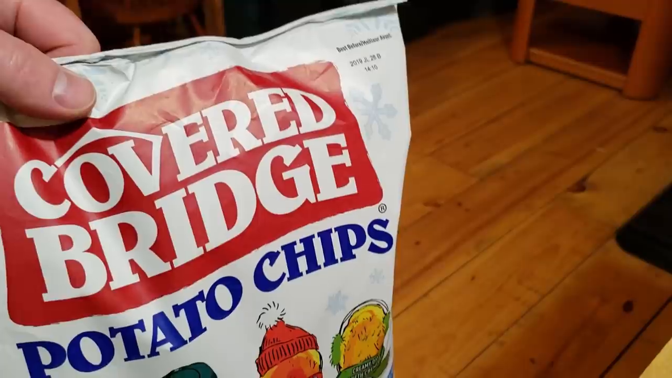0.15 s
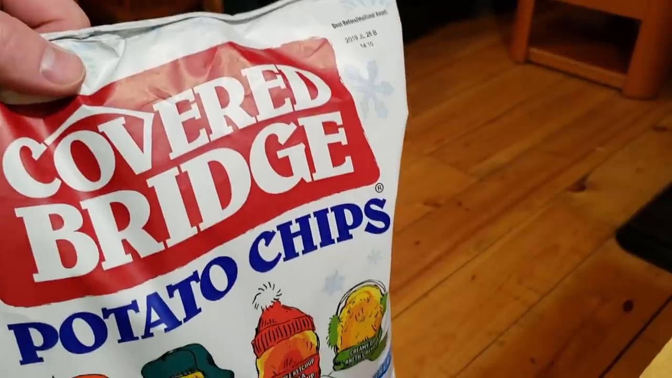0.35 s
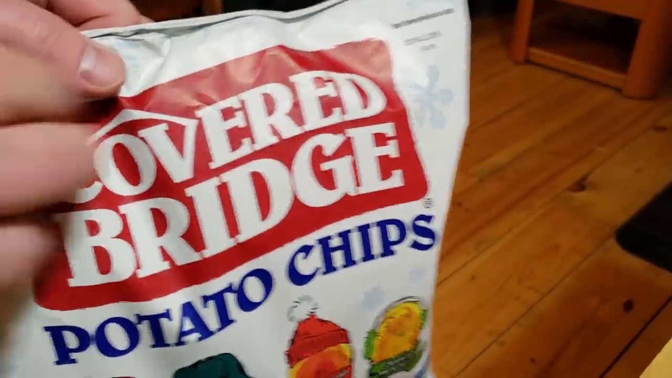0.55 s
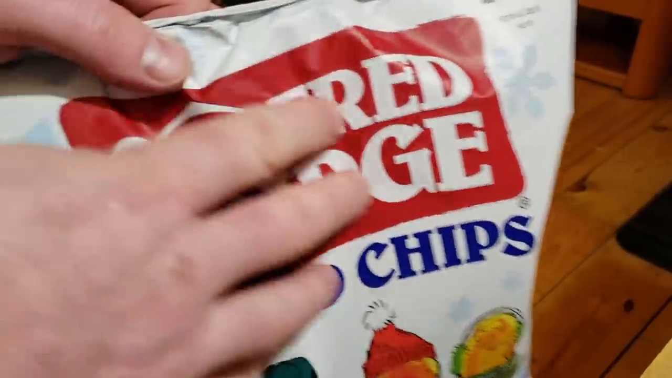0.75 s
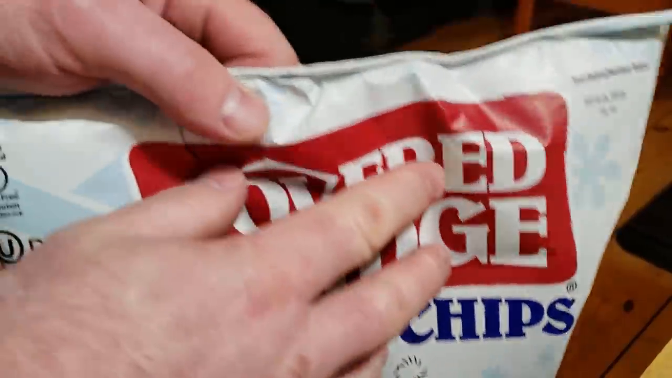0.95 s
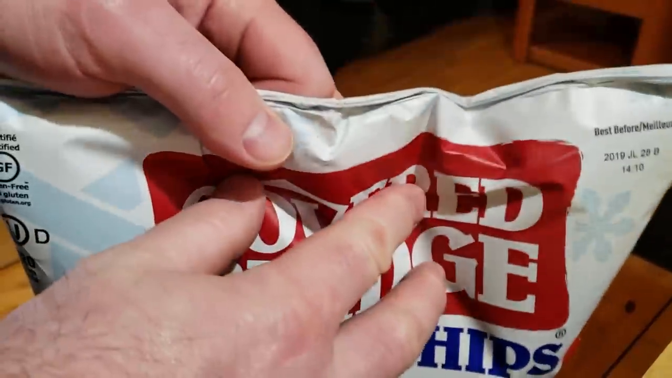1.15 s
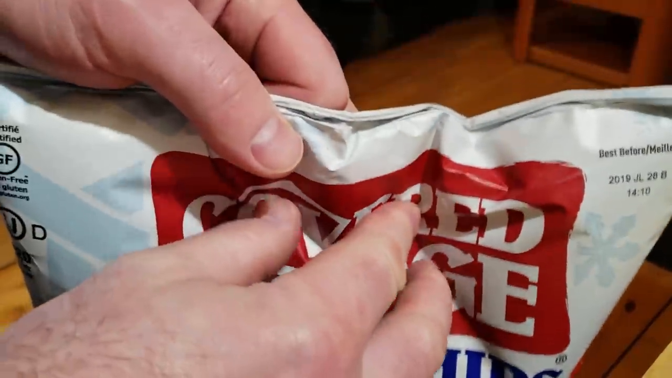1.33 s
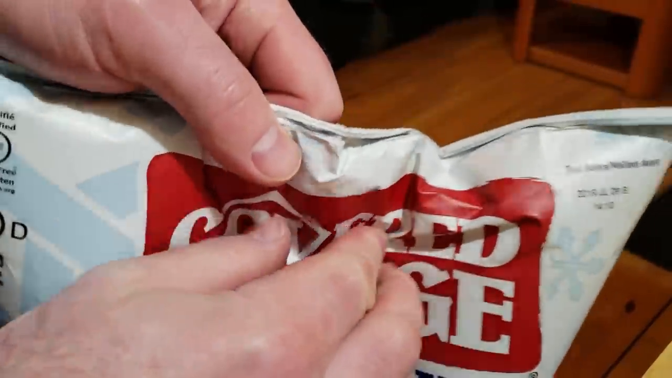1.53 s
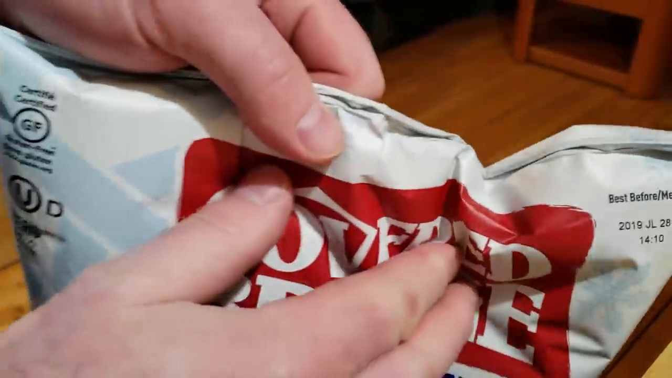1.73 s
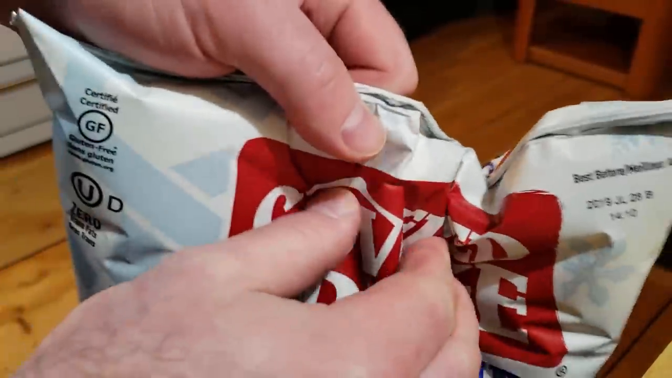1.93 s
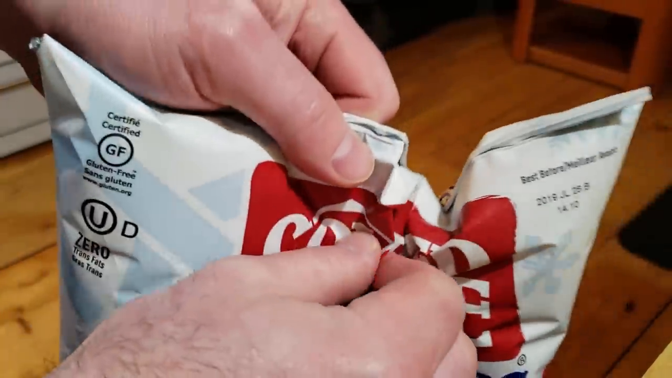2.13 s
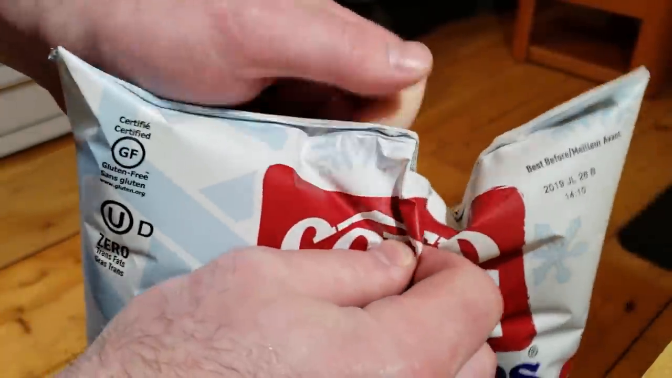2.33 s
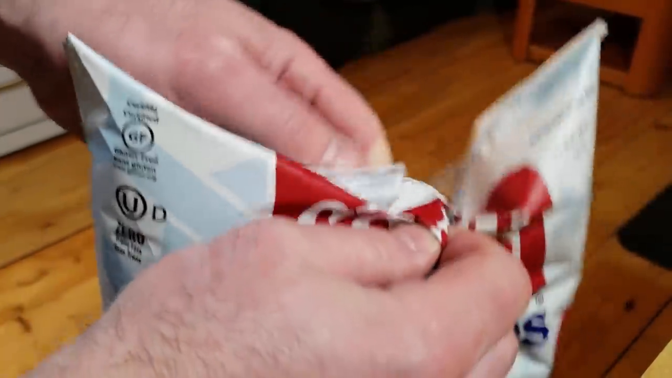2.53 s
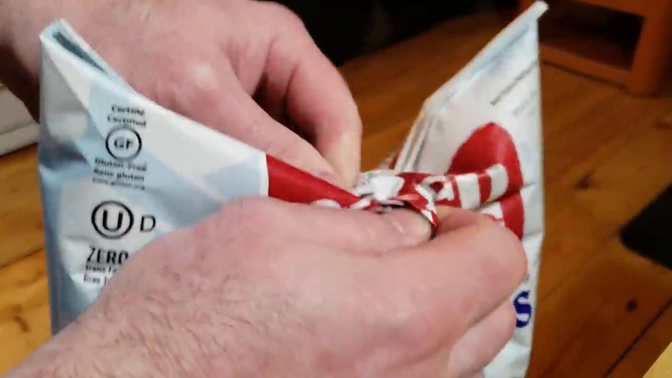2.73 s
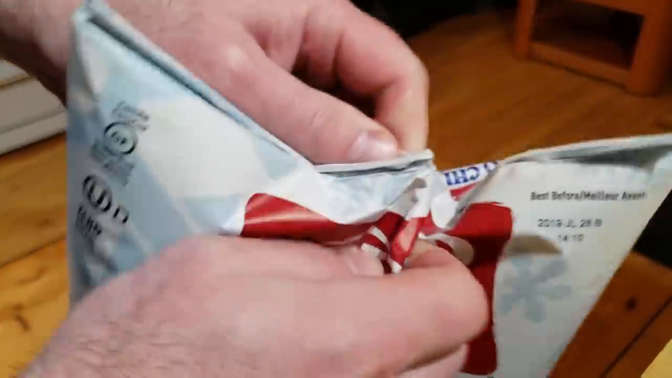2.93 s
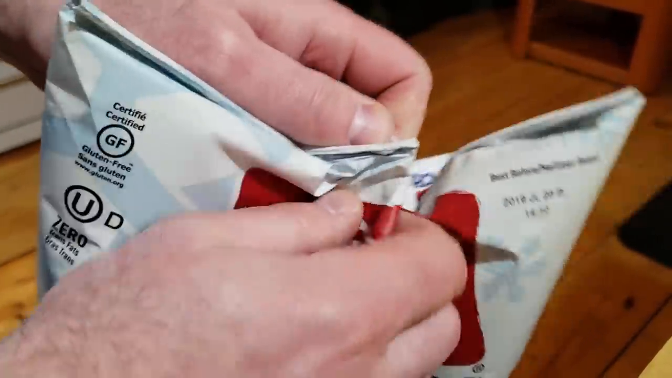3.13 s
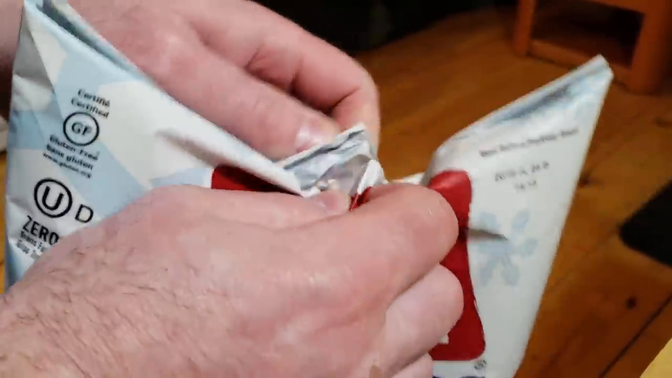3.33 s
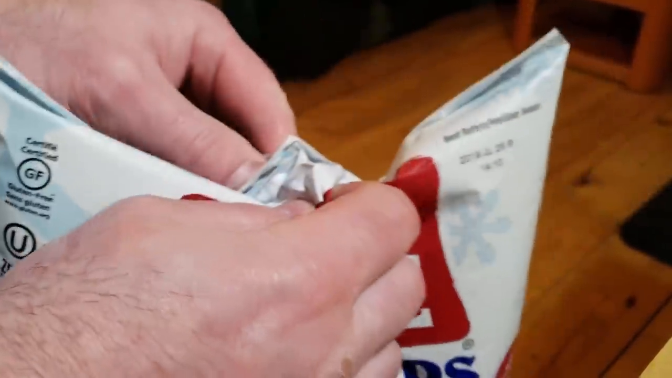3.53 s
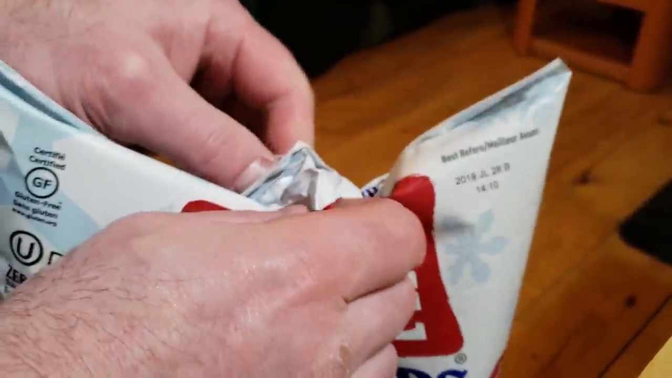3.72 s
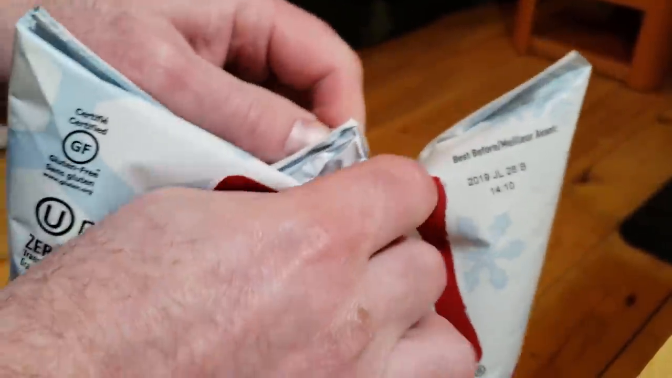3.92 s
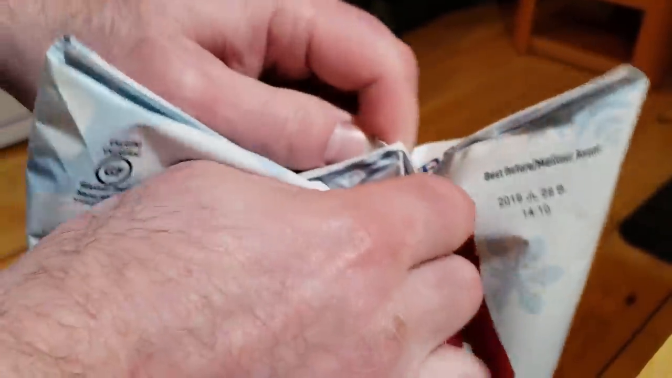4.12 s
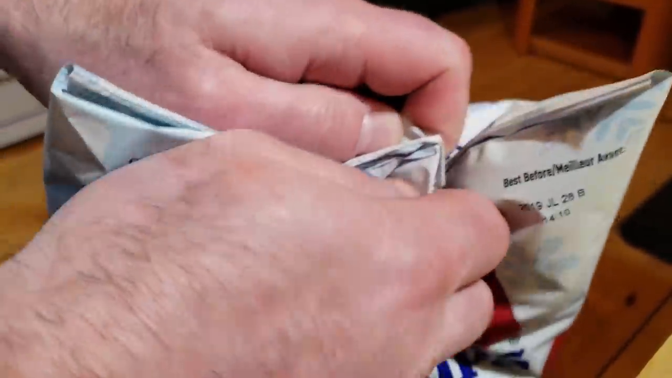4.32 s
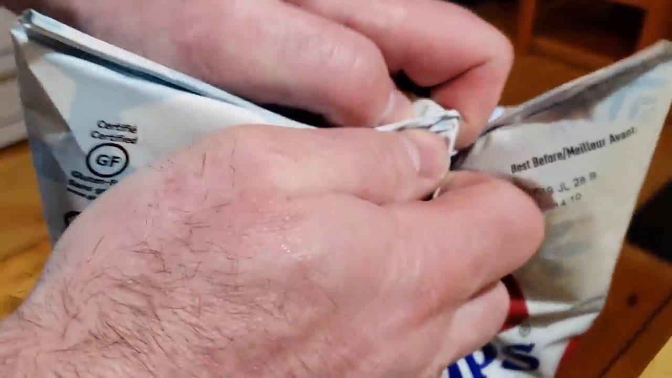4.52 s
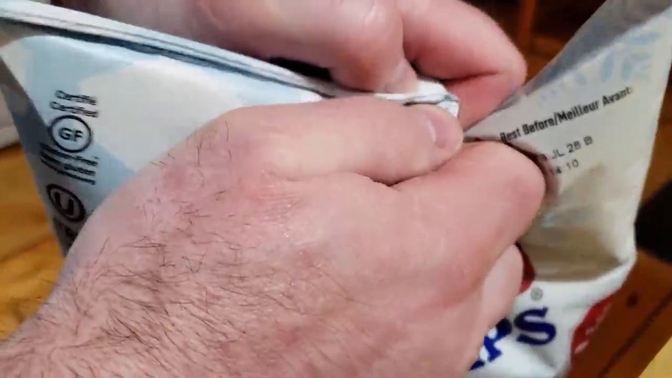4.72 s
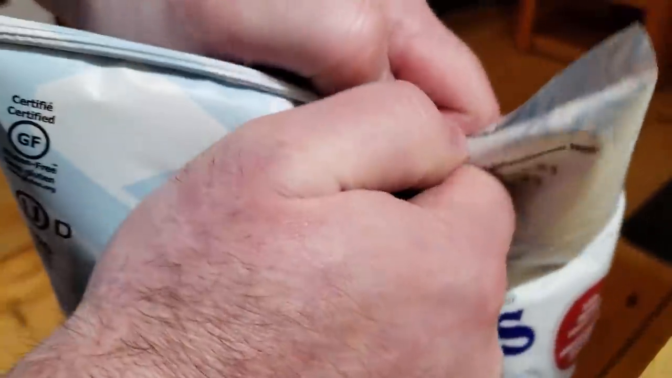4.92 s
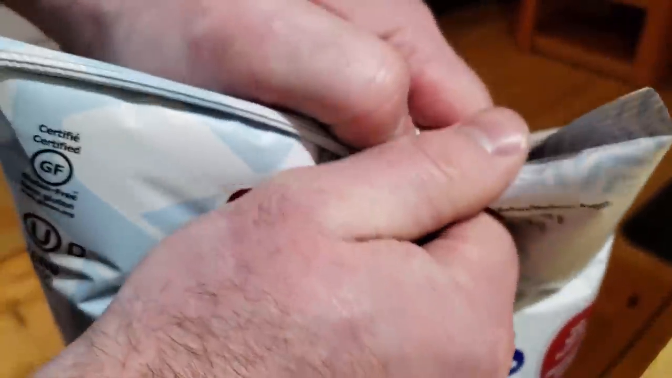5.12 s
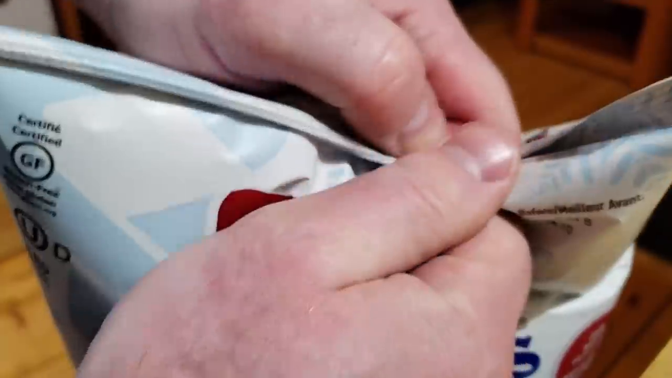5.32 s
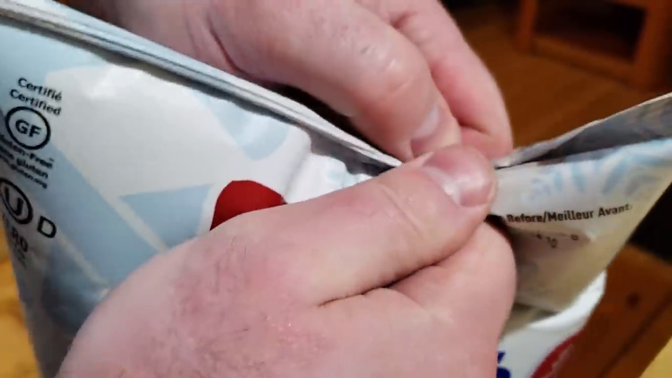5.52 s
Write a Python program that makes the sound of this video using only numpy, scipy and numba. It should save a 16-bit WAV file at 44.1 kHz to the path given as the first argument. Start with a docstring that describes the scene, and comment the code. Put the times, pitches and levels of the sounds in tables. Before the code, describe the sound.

A stiff foil chip bag is squeezed and twisted by hand, snapping and crinkling brightly and unevenly in a small room.

```python
"""A small room, where two hands crumple a foil snack bag just in front of a phone with two microphone ports.
A throbbing drone of beating harmonics sits in resonant rumble; an opening hiss soon drops almost to nothing.
Creases snap as bursts of dying ticks through a resonance, over a rustling swarm of smaller ones;
each snap sets off a flare of hiss and boom. The air in the bag rings as a bank of resonances,
puffs thump as decaying low sines, and the film pops as pairs of short sine rings."""
import sys
import numpy as np
from scipy import signal
from scipy.io import wavfile
from scipy.ndimage import uniform_filter1d
from numba import njit

SR = 44100
rng = np.random.default_rng(int(sys.argv[2]) if len(sys.argv) > 2 else 0)


def master_out(mix):
    """Clip the mix to full scale and print it as 16-bit PCM to the path in sys.argv[1]."""
    frames = np.transpose(np.atleast_2d(mix))
    ceiling = np.clip(frames, -1, 1)
    pcm = np.round(ceiling * 32767).astype(np.int16)
    wavfile.write(sys.argv[1], SR, pcm)


N = 249606

# Drone and rumble, before the phone's filters: t/s, level/dB (RMS of the drone)
HUM_LEVEL = [(0, -54.5), (.2, -56.5), (.3, -60.5), (.65, -55), (1.2, -67), (5.66, -70)]
# Rumble resonances, run twice in series; values for one pass: f/Hz, width/Hz, level/dB
RUMBLE_MODES = [(122, 61, 7), (248, 21, 7.5), (397, 125, -6)]
# Drone harmonics, relative levels: multiple of DRONE_HZ, level/dB
DRONE_HARMONICS = [(4, -5), (5, 0), (7, -3), (8, -3), (9, 0)]
# Smooth hiss, soon almost gone: t/s, level/dB (RMS)
AIR_LEVEL = [(0, -54), (.2, -57), (.25, -77)]
# Tone of the foil, also used to tint the hiss: f/Hz, level/dB
FOIL_TONE = [(300, -5.5), (800, -4), (1500, 3), (3800, 3.5), (6700, 4.5), (7800, 4), (9000, -2.5),
             (11000, 3), (12000, 2.5), (13500, 4.5), (15500, 3)]
# Resonances of the air in the bag; BAG_SLACK adds to the first two: f/Hz, width/Hz, level/dB
BAG_MODES = [(135, 200, 3), (263, 160, 1), (525, 62, -4.5), (642, 64, -4.5), (886, 346, -3)]
# How the bag's slackness shifts its two deepest rings: t/s, lowest level/dB, second level/dB
BAG_SLACK = [(0, 4, -26.5), (1.5, -8, -5.5), (4.2, -0.5, 5), (4.6, -14.5, -5.5), (5.66, -14, -8.5)]
# Handling, before foil tone: t/s, fine crackle level/dB, bag boom level/dB
HANDLING = [(0.3, -79, -80), (0.385, -63.5, -56), (0.42, -49, -46.5), (0.54, -55, -49), (0.675, -79, -70),
            (0.696, -46, -41), (0.99, -35, -34), (1.157, -35.5, -34.5), (1.268, -51.5, -56),
            (1.6, -42.5, -41.5), (2.03, -50, -50), (2.5, -38, -43), (2.87, -49.5, -57),
            (3.16, -48.5, -56.5), (3.282, -68.5, -62), (3.351, -45, -54), (3.62, -64, -68.5),
            (3.752, -44.5, -56.5), (4.008, -43.5, -55.5), (4.358, -39.5, -40), (4.61, -41, -48),
            (4.83, -34, -38), (5.21, -47, -49.5), (5.5, -47.5, -41.5), (5.66, -38, -50)]
# Large creases, before panning and foil tone: t/s, peak level/dB, ring f/Hz, boom level/dB re the peak
SNAPS = [(0.4045, -20, 4740, -12), (0.4895, -12.5, 3130, -18), (0.686, -15, 5470, -16),
         (0.736, -25, 4500, -1), (0.7444, -10, 3020, -17.5), (0.7825, -5, 4140, -11.5),
         (0.824, -6, 4160, -9), (0.8548, -1.5, 3770, -16.5), (0.932, 1.5, 11200, -12.5),
         (0.947, -11, 4500, -22), (0.9742, -7.5, 7600, -23), (0.985, 5.5, 4200, -13),
         (0.9952, -1, 6600, -31), (1.0286, -7.5, 6600, -17), (1.0543, -14, 3400, -37),
         (1.0706, -12.5, 4500, -15), (1.0912, -7, 2930, -36), (1.1025, -36, 4500, -30),
         (1.1501, -1.5, 4860, -14.5), (1.1612, -3, 3600, -20), (1.211, -15, 3430, -29),
         (1.4054, -13.5, 4800, -11.5), (1.4633, -5.5, 6600, -16), (1.5017, -5, 6400, -10),
         (1.5645, -17.5, 7000, -16), (1.5843, -2.5, 6650, -24), (1.591, -17, 4050, -21),
         (1.612, -13, 5000, -11), (1.622, -20, 6000, -35), (1.6409, -6.5, 5100, -34),
         (1.6785, -11.5, 6000, -30), (1.7098, -6, 4700, -18), (1.7462, -11, 5930, -18),
         (1.7816, -16, 1400, -26), (1.816, -6, 6200, -35), (1.831, -31, 6600, -38),
         (1.896, -18.5, 3020, -17), (1.9284, -8.5, 1900, -19), (2.0241, -22.5, 6120, -19),
         (2.053, -14.5, 3760, -16), (2.094, -15.5, 11200, -46), (2.126, -12, 6100, -29),
         (2.159, -14.5, 3850, -41), (2.1918, -22, 5300, -31), (2.235, -14.5, 6400, -31),
         (2.2743, -16, 3720, -26), (2.3305, -6, 3700, -36), (2.4008, -14, 6300, -12),
         (2.4065, -8.5, 5200, -27), (2.4157, -14.5, 9300, -37), (2.5025, -11.5, 4700, -11.5),
         (2.5157, -6.5, 7300, -43), (2.533, -16.5, 2500, -6), (2.5502, -10, 1100, -14),
         (2.572, -9.5, 3540, -24), (2.6, -10.5, 1840, -10), (2.6376, -12, 5650, -42),
         (2.6955, -19.5, 5800, -19), (2.757, -20.5, 1090, -19), (2.8076, -13.5, 6600, -44),
         (2.8979, -12, 1610, -14), (2.9228, -16, 4730, -17), (2.9399, -16, 1810, -19),
         (2.9513, -11, 1370, -18), (3.0284, -19, 1710, -19), (3.0662, -18.5, 1820, -20),
         (3.101, -25, 4260, -13), (3.1508, -22, 4800, -14.5), (3.3057, -29.5, 7700, -33),
         (3.386, -24, 7000, -26), (3.401, -22.5, 4050, -16), (3.427, -21.5, 6050, -25),
         (3.477, -24, 9100, -17), (3.647, -27.5, 11200, -47), (3.6871, -20.5, 4000, -45),
         (3.711, -38, 8000, -25), (3.741, -15, 4000, -20), (3.7584, -18.5, 8500, -46),
         (3.896, -13, 7500, -26), (3.9206, -14, 7550, -16), (4.041, -19.5, 6000, -28),
         (4.1043, -8.5, 3600, -20), (4.18, -17.5, 9000, -22), (4.2961, -5.5, 2860, -20),
         (4.3724, -10.5, 2020, -25), (4.3816, -7.5, 3800, -11), (4.4432, -13, 2700, -10),
         (4.4835, -6, 1920, -14.5), (4.494, -17, 1200, -11), (4.5364, -9, 2840, -35),
         (4.5415, -11.5, 2100, -39), (4.566, -6, 7040, -20), (4.6328, -6, 11000, -25),
         (4.6726, -14, 8100, -30), (4.6947, -17, 4400, -11), (4.7764, -8, 10500, -22),
         (4.8144, -3, 4900, -30), (4.8256, -14.5, 5950, -4.5), (4.8362, -10, 4230, -18),
         (4.8831, -11.5, 7200, -22), (4.9338, -7.5, 4900, -10), (4.947, -14, 6800, -21),
         (4.9982, -10, 5460, -15), (5.0185, -5.5, 4300, -23), (5.099, -17, 7600, -8.5),
         (5.1721, -10.5, 3300, -39), (5.2521, -12.5, 1680, -12), (5.2845, -11.5, 2200, -11.5),
         (5.3315, -6, 1090, -10), (5.4067, -8.5, 1060, -6), (5.432, -11, 4440, -13.5),
         (5.443, -16, 2000, -19), (5.525, -7, 2000, -32), (5.5663, -6.5, 1210, -25),
         (5.5945, -10, 2200, -30), (5.6249, -17, 8100, -9)]
# Puffs of air and knocks as the bag is squeezed: t/s, peak level/dB (nominal), f/Hz, left minus right level/dB
THUMPS = [(0.491, -37, 91, 1), (1.097, -28, 60.3, 27), (1.462, -25.5, 103, -36), (1.58, -22.5, 89.5, -36),
          (2.156, -33, 51.3, 0), (2.55, -11.5, 79, -43), (4.145, -32, 118, 3)]
# Film buckling: t/s, level/dB of the lower ring before decay, its f/Hz
POPS = [(0.493, -25, 570), (0.948, -20, 222), (1.5645, -20.5, 530), (2.001, -20, 550), (4.1427, -16, 260),
        (4.7835, -13.5, 720), (5.406, -20, 660)]

DRONE_HZ, DRONE_BEAT_S = 26.4, 0.0085  # throb rate, time offset of the beat
SNAP_T60_S, BOOMY_LONGER = 0.0105, 0.1  # ring-out at -20 dB boom; dB of ring-out time per dB of boom
SNAP_LEAD, SNAP_DAMP = 4.5, 0.42  # extra first tick in tick RMS units; ring width / frequency
SNAP_AFTER, SNAP_RING = 0.05, 0.45  # shares of aftershock and ring, 0..1
FINE_T60_S = 0.002, 0.007  # shortest ring-out of a small crease, and its spread
FLARE_DB, FLARE_BOOM_DB, FLARE_S = -30, -14, 0.008  # hiss and boom offsets; time to fall to 1 / e
POP_CYCLES = 0.8  # cycles of the lower ring to fall to 1 / e
POP_UPPER, POP_UPPER_DB = 2.51, -10.5  # upper ring as a multiple of the lower, and its relative level
ROOM_T60_S, ROOM_DB = 0.21, -16.5  # reverb time, gain of the unit-energy tail
TOP_HZ = 17050  # stopband edge of the phone's last lowpass


def undb(db):
    """Turn decibels into amplitude."""
    return 10 ** (np.asarray(db) / 20)


def level(x, db):
    """Set the overall RMS in dB."""
    return x * undb(db) / np.sqrt(np.mean(x ** 2))


def curve(s, values):
    """Draw straight lines between timed points."""
    return np.interp(np.arange(N) / SR, s, values)


def modes(x, table):
    """Sum two-pole resonances."""
    out = 0
    for hz, width, db in table:
        out = out + undb(db) * signal.lfilter(*signal.iirpeak(hz, hz / width, fs=SR), x)
    return out


def colour(x, points):
    """Shape the spectrum smoothly through frequency and level points."""
    hz, db = np.transpose(points)
    grid = np.linspace(0, SR / 2, 257)
    gain = undb(np.interp(np.log(grid + 1), np.log(hz), db))
    gain = gain * (grid < SR / 2 - 1)  # silence at the very top of the band
    taps = signal.firwin2(255, grid, gain, fs=SR)
    return signal.fftconvolve(x, taps[None], mode="same", axes=1)


def hum():
    """A throbbing motor-like drone in low room rumble; it dips, swells back, then sinks away."""
    mid, side = rng.standard_normal((2, N))
    rumble = mid + 0.32 * side * np.array([[1], [-1]])
    rumble = modes(modes(rumble, RUMBLE_MODES), RUMBLE_MODES)
    turn = 2 * np.pi * DRONE_HZ * (np.arange(N) / SR - DRONE_BEAT_S)
    drone = np.zeros(N)
    for k, db in DRONE_HARMONICS:
        smear = 0.13 * (k - 6) ** 2  # phase spread smears each beat in time
        drone -= undb(db) * np.cos(k * turn + smear)
    return (level(rumble, -2) + level(drone, 0)) * undb(curve(*np.transpose(HUM_LEVEL)))


def air():
    """Treble hiss from separate noise at the two ports."""
    highpass = signal.butter(2, 2500, "high", fs=SR)
    hiss = signal.lfilter(*highpass, rng.standard_normal((2, N)))
    return level(colour(hiss, FOIL_TONE), 0) * undb(curve(*np.transpose(AIR_LEVEL)))


@njit
def bursts(start, hz, fall, gain, lag, ticks, damp, wide, ring, rise, after):
    """Each crease plays dying ticks through its own patch resonance, with a time offset between ports."""
    length = ticks.shape[1]
    margin = 16  # room for negative lags
    out = np.zeros((2, length + 64))
    one = np.zeros((2, length))
    for e in range(len(start)):
        g = np.tan(np.pi * hz[e] / SR)
        slow = fall[e] ** .2  # the aftershock dies five times slower
        top = 1e-9
        n = 0
        for c in range(2):
            band, low = 0., 0.  # state of the resonant filter
            main, tail, onset = 1., after, 1.
            n = 0
            while main + tail > 2e-3 and start[e] + n < length:
                onset *= rise
                i = start[e] + n
                tick = (1 - wide) * ticks[0, i] + wide * ticks[1 + c, i]
                x = (main + tail) * (1 - onset) * tick
                v = (band + g * (x - low)) / (1 + g * (g + damp))
                band, low = 2 * v - band, low + 2 * g * v
                one[c, n] = (1 - ring) * x + ring * v
                top = max(top, abs(one[c, n]))
                main *= fall[e]
                tail *= slow
                n += 1
        for c in range(2):
            i = start[e] + margin + (lag[e] if c == 0 else 0)
            out[c, i:i + n] += gain[c, e] / top * one[c, :n]
    return out[:, margin:margin + length]


def creases(s, hz, t60, db, pan_db, spiky_db, damp, wide, ring, rise_s, after, lead):
    """Folds crackle in uneven ticks, and the foil settles with a weaker, longer aftershock."""
    ticks = rng.standard_normal((3, N)) * undb(spiky_db * rng.standard_normal(N))
    lag = rng.integers(-6, 3, len(s))  # left port against right, samples
    first = (s * SR).astype(int).clip(0, N - 1)
    # the fold gives way with one hard tick
    ticks[:, first] += lead * np.sign(ticks[0, first]) * ticks.std()
    gain = undb(db + np.array([pan_db, -pan_db]) / 2)
    fall = np.exp(-np.log(1000) / (np.clip(t60, .002, .2) * SR))
    rise = np.exp(-1 / (rise_s * SR))
    wide, ring, after = np.clip([wide, ring, after], 0, 1)
    start = ((s - 2 * rise_s) * SR).astype(np.int64).clip(0, N)
    hz = np.clip(hz, 100, 16000)
    return bursts(start, hz, fall, gain, lag, ticks, damp, wide, ring, rise, after)


def bag(x):
    """The air in the bag rings; its two lowest modes need a slack bag."""
    s, *deep_db = np.transpose(BAG_SLACK)
    x = signal.lfilter(*signal.butter(2, 70, "high", fs=SR), x)
    out = modes(x, BAG_MODES[2:])
    for mode, db in zip(BAG_MODES, deep_db):
        out = out + modes(x, [mode]) * undb(curve(s, db))
    return out


def flare(db):
    """A gain that jumps at each large snap and fades exponentially."""
    kick = np.zeros(N)
    kick[(np.array(SNAPS)[:, 0] * SR).astype(int)] = undb(db)
    return signal.lfilter([1], [1, -np.exp(-1 / (FLARE_S * SR))], kick)


def rustle(count):
    """A swarm of small creases, some clustered where one fold sets off its neighbours, over sliding skin noise."""
    s, fine_db, boom_db = np.transpose(HANDLING)
    when, tone, size, side, last = rng.random((count, 5)).T
    folds = rng.random(count // 12) * N / SR
    lone = side > .15  # the rest trail after shared folds
    clustered = np.resize(folds, count) - 0.0074 * np.log(1 - when)
    when = np.where(lone, when * N / SR, clustered)
    size_db = -4.0 * np.log(size + .05)  # many small, few large
    pan_db = -2.2 + 13.6 * (last - .5)
    fine = creases(when, 1500 * 10.06 ** tone, FINE_T60_S[0] + FINE_T60_S[1] * last, size_db, pan_db,
                   spiky_db=5.0, damp=0.6, wide=0.5, ring=0.5, rise_s=.0002, after=0.05, lead=2.5)
    few = slice(0, count // 2)  # half of the creases also give a duller sound that drives the bag
    dull = creases(when[few], 200 * 3.06 ** tone[few], 0.0073 + 0.0034 * last[few],
                   size_db[few] / 2, 0.081 * pan_db[few],
                   spiky_db=3.5, damp=0.48, wide=0.2, ring=0.77, rise_s=0.00036, after=0.15, lead=0.98)

    hold = SR // 40  # fingers slide over the foil in fits and starts
    grip = np.repeat(rng.standard_normal(N // hold + 1), hold)[:N]
    grip = uniform_filter1d(grip, hold // 2)
    skin = rng.standard_normal((2, N))
    fine = level(fine, 0) + level(skin * undb(5 * grip), -2)
    push = level(dull, 0) + level(skin + skin.mean(axis=0), -2.4)
    boom = level(bag(push), 0)

    snap_db, snap_boom_db = np.array(SNAPS)[:, 1], np.array(SNAPS)[:, 3]
    fine_gain = undb(curve(s, fine_db))
    boom_gain = undb(curve(s, boom_db)) + flare(snap_db + snap_boom_db + FLARE_BOOM_DB)
    hiss = skin * flare(snap_db + FLARE_DB)
    return colour(fine * fine_gain + hiss, FOIL_TONE) + boom * boom_gain


def snaps():
    """Large creases: a bright crack, and one soft push that rings the air in the bag."""
    s, db, hz, boom_db = np.transpose(SNAPS)
    # folds that move more air ring longer
    t60 = SNAP_T60_S * undb(BOOMY_LONGER * (boom_db + 20))
    pan_db = -2.5 + 2 * rng.standard_normal(len(s))
    crack = creases(s, hz, t60, db, pan_db, spiky_db=1.0, damp=SNAP_DAMP, wide=0.16, ring=SNAP_RING,
                    rise_s=0.00048, after=SNAP_AFTER, lead=SNAP_LEAD)
    push = np.zeros((2, N))
    push[:, (s * SR).astype(int)] = -undb(db + boom_db + 25.5)
    push = signal.lfilter(*signal.butter(1, [70, 1200], "band", fs=SR), push)
    return colour(crack, FOIL_TONE) + bag(push)


def thumps():
    """A sharp suck of air, then a slow swing back; a puff often strikes mainly one port."""
    out = np.zeros((2, N + SR))
    t = np.arange(SR // 10) / SR
    suck = 4.8 * np.exp(-t / 0.00045) * (1 - np.exp(-t / 0.00028))
    for s, db, hz, pan_db in THUMPS:
        swing = 1.68 * np.exp(-t * hz * 2.4) * np.sin(2 * np.pi * hz * t)
        port_db = db + np.minimum([[pan_db], [-pan_db]], 0)  # turn down only the far port
        i = int(s * SR)
        out[:, i:i + len(t)] += undb(port_db) * (swing - suck)
    return out[:, :N]


def pops():
    """A dent in the film flips inward and rings briefly at two pitches, the same at both ports."""
    out = np.zeros(N + SR)
    t = np.arange(SR // 20) / SR
    for s, db, hz in POPS:
        lower = np.sin(2 * np.pi * hz * t)
        upper = undb(POP_UPPER_DB) * np.sin(2 * np.pi * POP_UPPER * hz * t)
        i = int(s * SR)
        out[i:i + len(t)] -= undb(db) * np.exp(-t * hz / POP_CYCLES) * (lower + upper)
    # a small dent moves no deep bass
    return signal.lfilter(*signal.butter(2, 80, "high", fs=SR), out[:N])


def room(x):
    """Close walls: a dying noise tail, different at each port."""
    t = np.arange(int(.3 * SR)) / SR
    decay = np.exp(-np.log(1000) * t / ROOM_T60_S) * (t > .003)
    tail = rng.standard_normal((2, len(t))) * decay
    tail = signal.lfilter(*signal.butter(1, 6000, fs=SR), tail)  # soft furnishings take the treble
    tail = tail / np.sqrt(np.sum(tail ** 2, axis=1, keepdims=True))
    return undb(ROOM_DB) * signal.fftconvolve(x, tail, axes=1)[:, :N]


def scene():
    """Put the foil in its room, with the thumps, hum and air kept dry."""
    foil = rustle(count=1600) + snaps() + pops()
    return hum() + air() + foil + room(foil) + thumps()


def record(dry):
    """The phone cuts the lowest bass, rounds the loudest cracks and cuts the top in two steps."""
    x = signal.sosfilt(signal.butter(2, 30, "high", fs=SR, output="sos"), dry)
    x = 0.85 * np.tanh(x / 0.85)
    x = signal.sosfilt(signal.ellip(7, .3, 24, 15800, fs=SR, output="sos"), x)
    return signal.sosfilt(signal.cheby2(24, 90, TOP_HZ, fs=SR, output="sos"), x)


dry = scene()
out = record(dry)
master_out(out)
```